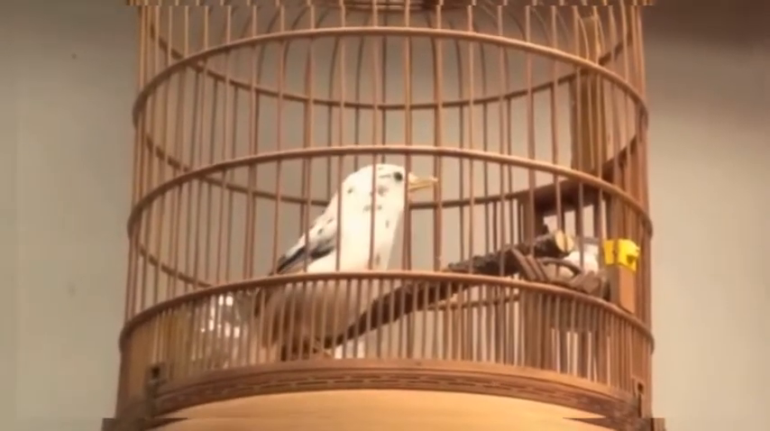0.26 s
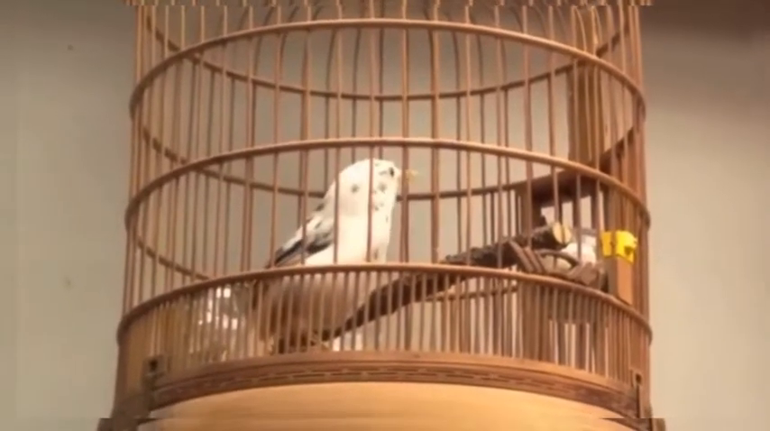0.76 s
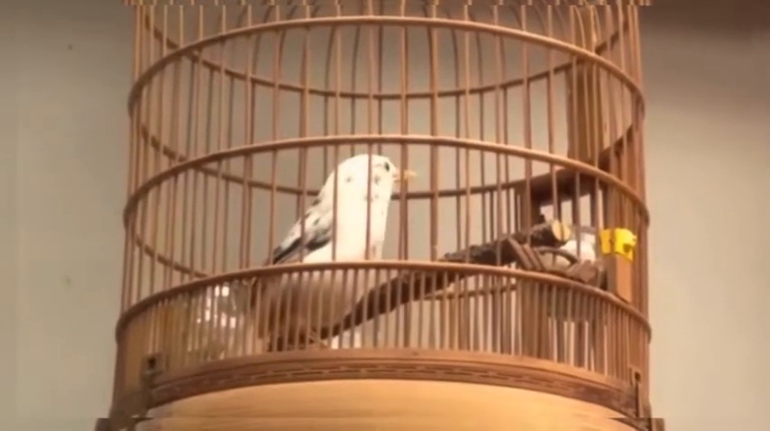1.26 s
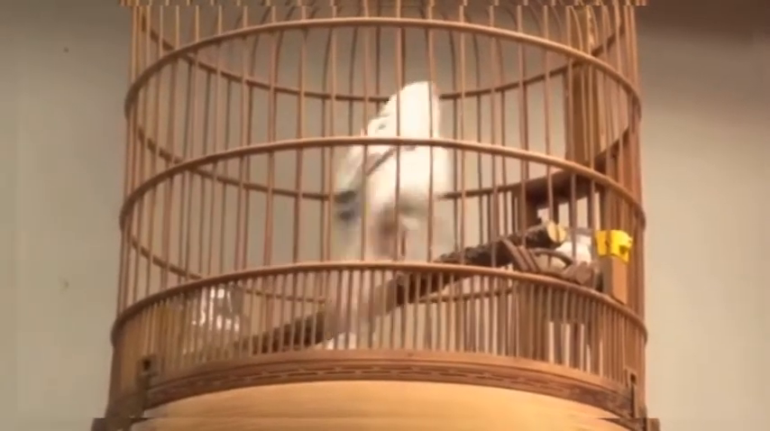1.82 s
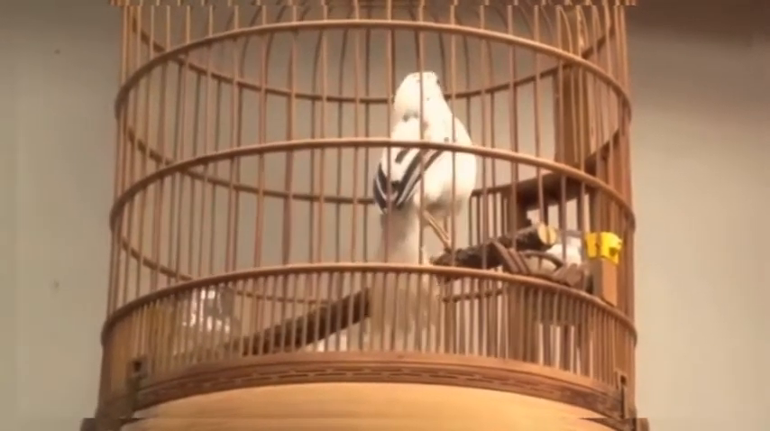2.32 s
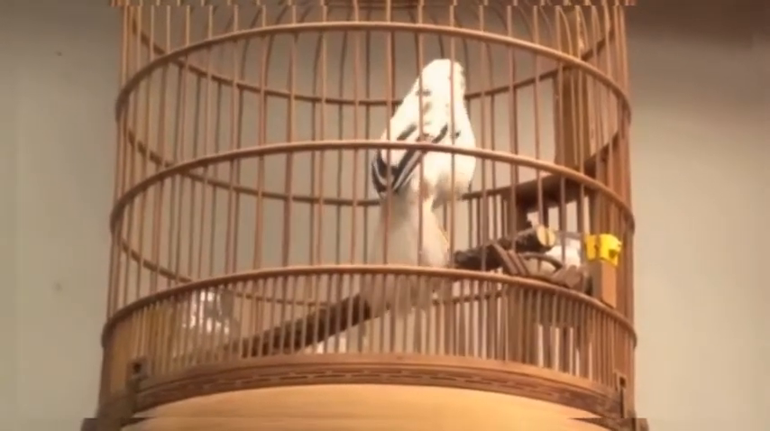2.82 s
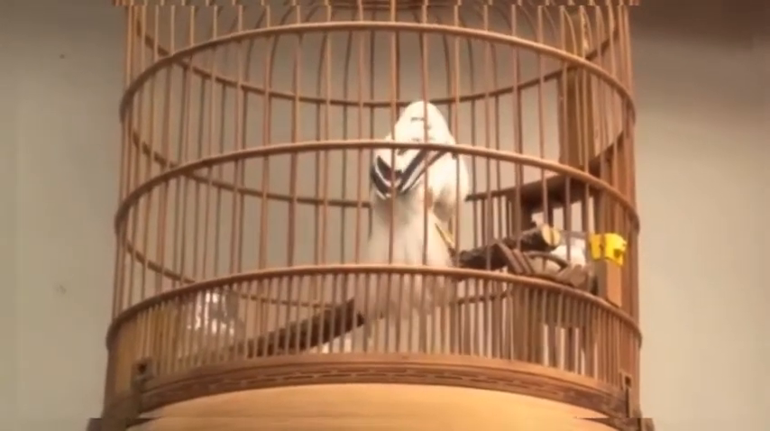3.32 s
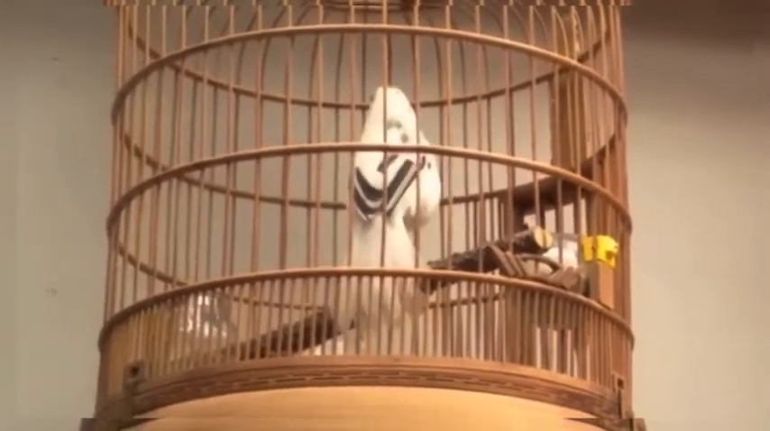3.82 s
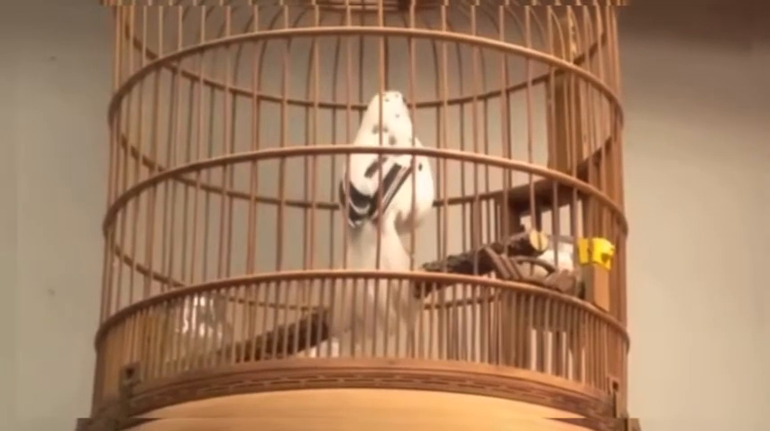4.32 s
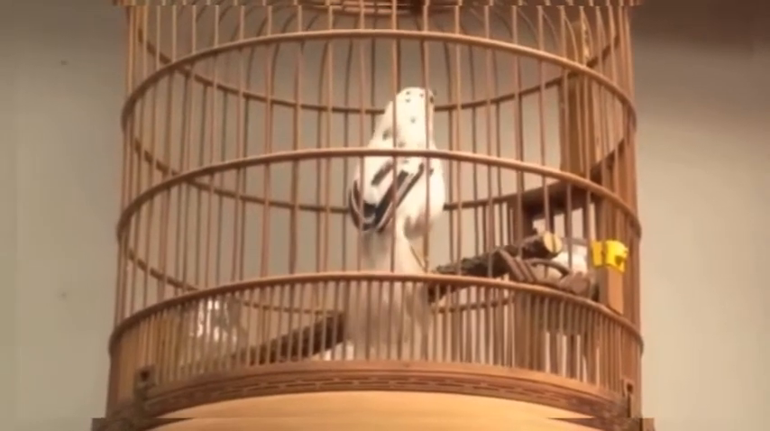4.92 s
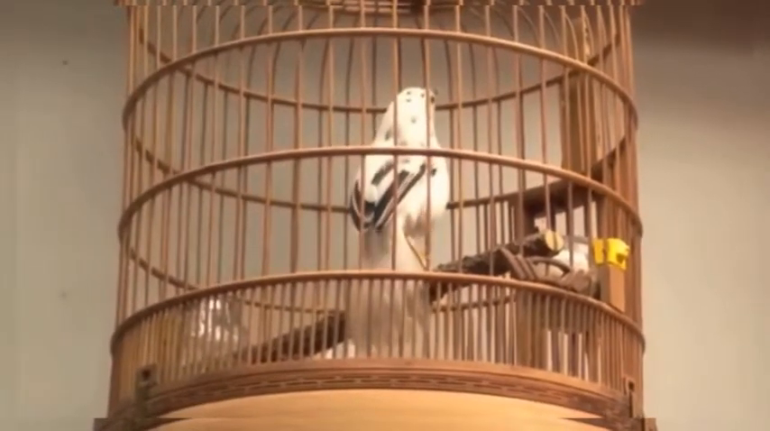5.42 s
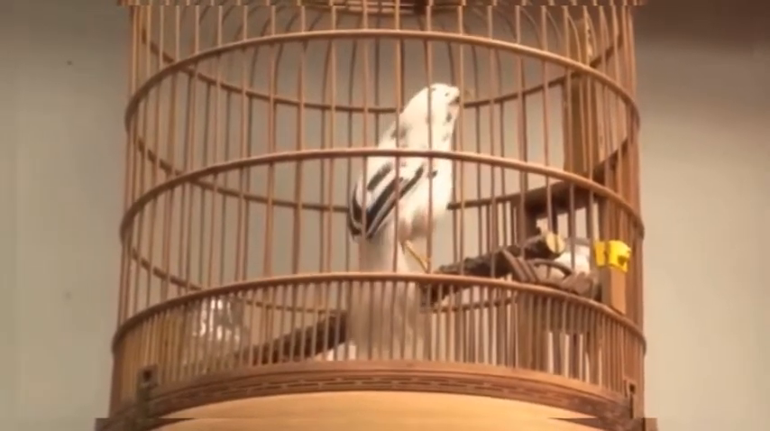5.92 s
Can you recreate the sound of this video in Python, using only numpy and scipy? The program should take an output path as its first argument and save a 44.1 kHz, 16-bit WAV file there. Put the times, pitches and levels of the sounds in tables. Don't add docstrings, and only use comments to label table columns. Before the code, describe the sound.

In a bare, echoing room, two birds overlap at first, the nearer one so loud it distorts. Then the caged bird sings alone at some distance: hoarse plunging chirps, soft falling calls, clear upward whistles, a rapid trill, a fast warble, two round whistles and a loud final note. Two dull knocks on the cage, the second harder, sit among the calls. Low rumble and airy hiss continue beneath, in stereo.

```python
import sys
import numpy as np
from scipy import signal
from scipy.io import wavfile
from scipy.ndimage import uniform_filter1d

SR = 44100
rng = np.random.default_rng(int(sys.argv[2]) if len(sys.argv) > 2 else 0)


def boost_factor(decibels):
    exponent = np.asarray(decibels, float) / 20
    return 10 ** exponent


def log_audio(samples):
    frames = np.atleast_2d(samples).T
    limited = np.clip(frames, -1, 1)
    pcm = np.round(limited * 32767).astype(np.int16)
    wavfile.write(sys.argv[1], SR, pcm)


N = 271656
LEAD = 6000

# (frequency [Hz], correlation [-1 to 1])
LIKENESS = [(25, .6), (70, .8), (150, .7), (300, .6), (600, .4), (1400, .1), (3000, .05), (15000, 0)]


def rms_one(x):
    return x / np.sqrt(np.mean(x ** 2) + 1e-20)


def at_hz(points, hz):
    points_hz, values = np.transpose(points)
    return np.interp(np.log(hz), np.log(points_hz), values)


def drift(rate_hz):
    r = np.exp(-80 * np.pi * rate_hz / SR)
    slow = signal.lfilter([1], [1, -2 * r, r * r], rng.standard_normal(N // 40 + 2002))[2000:]
    return np.interp(np.arange(N) / 40, np.arange(len(slow)), rms_one(slow))


def bandpass(low_hz, high_hz):
    return signal.butter(2, [low_hz, high_hz], "band", fs=SR, output="sos")


def bands(low_hz, high_hz):
    edges = low_hz * 2 ** np.arange(0, np.log2(high_hz / low_hz), .5)
    return [(np.sqrt(a * b), bandpass(a, b)) for a, b in zip(edges, edges[1:])]


def stereo_pair(mid, side, hz):
    alike = np.clip(at_hz(LIKENESS, hz), -1, 1)
    return np.sqrt(1 + alike) * mid + np.sqrt(1 - alike) * side * [[1], [-1]]


def banded_noise(spectrum, low_hz, high_hz, patchy_db):
    out = 0
    white = rng.standard_normal((2, 2, N))
    for k, (hz, sos) in enumerate(bands(low_hz, high_hz)):
        mid, side = signal.sosfilt(sos, white[k % 2])
        gain = boost_factor(at_hz(spectrum, hz) + patchy_db * drift(3.8))
        out = out + gain * stereo_pair(mid, side, hz)
    return rms_one(out)


def resonant_noise(modes):
    out = 0
    for hz, width_hz, db in modes:
        r = np.exp(-np.pi * width_hz / SR)
        ringing = [1, -2 * r * np.cos(2 * np.pi * hz / SR), r * r]
        mid, side = signal.lfilter([1, 0, -1], ringing, rng.standard_normal((2, N)))
        out = out + boost_factor(db + 1.2 * drift(5.8)) * rms_one(stereo_pair(mid, side, hz))
    return out


def humps(rows):
    t = np.arange(N) / SR
    return sum(db * np.exp(-((t - s) / half) ** 2) for s, half, db in rows)


def background_level():
    # (time [s], level [dB])
    level = [(0.0, -44), (0.88, -47), (0.95, -50.5), (1.1, -53), (1.75, -51.5), (1.92, -47.5), (2.08, -53),
             (3.14, -53.5), (3.5, -50), (4.459, -53), (4.65, -64), (4.781, -53.5), (5.2, -60), (5.42, -63),
             (5.6, -55.5), (5.92, -54), (6.0, -47), (6.16, -43.5)]
    return np.interp(np.arange(N) / SR, *np.transpose(level))


def rumble(swing_db):
    # (frequency [Hz], density [dB per Hz])
    spectrum = [(20, -13), (45, -20), (70, 5), (150, -37), (300, 0.5), (500, 2.5), (800, -1.5),
                (1200, -0.5), (1600, -5)]
    # (middle [s], half width [s], change [dB])
    lulls = [(1.9, 0.29, -5.5), (3.14, 0.36, -7), (3.6, 0.16, -7), (4.03, 0.16, -21), (4.8, 0.078, -7)]
    level_db = -51 + 3 + 0.49 * swing_db + humps(lulls)
    return boost_factor(level_db) * banded_noise(spectrum, 21.85, 1700, patchy_db=3.1)


def boom(swing_db):
    # (frequency [Hz], width [Hz], level [dB])
    modes = [(82.7, 6.8, -14), (109, 31, -0.5), (132.8, 2.4, -4.5), (230.5, 37, -4.5), (317.6, 24, -3.5),
             (340, 13, -26)]
    # (middle [s], half width [s], change [dB])
    swells = [(.07, 0.13, 2), (.87, 0.034, 10.5), (2.12, 0.053, 5), (2.75, .04, 11), (3.55, 0.32, 9),
              (4.5, 0.23, 7)]
    level_db = -49.5 - 3.5 + 0.38 * swing_db + humps(swells)
    return boost_factor(level_db) * resonant_noise(modes)


def hiss(level_db):
    # (frequency [Hz], density [dB per Hz])
    spectrum = [(700, -8), (1300, -15), (2200, 10.5), (3700, -1.5), (5200, 5.5), (6800, -16), (9500, -4.5),
                (11000, -15), (13000, -17), (15000, -11)]
    # (frequency [Hz], width [Hz], level [dB])
    whine = [(3920, 6, -5), (3750, 16.5, 4), (4650, 25, -5)]
    rush = boost_factor(14.5) * banded_noise(spectrum, 684, 17000, patchy_db=1.5)
    return boost_factor(level_db) * (rush + resonant_noise(whine))


def taps():
    # (time [s], peak level [dB])
    knocks = [
        (2.751, -39),
        (4.379, -21.5),
    ]
    clicks = np.zeros(N) + 1e-18
    for s, db in knocks:
        clicks[round(s * SR)] = boost_factor(db) * 12
    return signal.sosfilt(bandpass(150, 900), clicks)


def room(x, direct_db):
    # (frequency [Hz], time to fall 60 dB [s])
    t60 = [(500, 0.64), (1500, 0.42), (2500, 0.48), (3500, .48), (5000, 0.5), (12000, 0.3)]
    build_s, early_db, early_t60_s = 0.0041, -14, 0.1
    t = np.arange(SR) / SR
    white = rng.standard_normal((2, SR))
    early = boost_factor(early_db - 60 * t / early_t60_s)
    tail = 0
    for hz, sos in bands(349.0, 21000):
        tail = tail + signal.sosfilt(sos, white) * (boost_factor(-60 * t / at_hz(t60, hz)) + early)
    tail = tail * (1 - np.exp(-t / build_s))
    tail = tail / np.sqrt(np.sum(tail ** 2, axis=1, keepdims=True))
    echo = signal.fftconvolve(x[None], tail, axes=1)[:, LEAD:LEAD + N]
    return echo + boost_factor(direct_db) * x[LEAD:]


def add(out, t, hz, db, wobble, air, beak_db=0):
    overtones = [-28.5, -37, -40, -43.5]
    breath_db, beak_db_per_octave = -32, 16
    i = (t * SR).round().astype(int)
    phase = 2 * np.pi * np.cumsum(hz + wobble[np.clip(i, 0, N - 1)]) / SR
    upper = boost_factor(breath_db) * air[i % N]
    for multiple, over_db in enumerate(overtones, start=2):
        upper += boost_factor(over_db) * np.sin(multiple * phase) * (multiple * hz < .45 * SR)
    wave = np.sin(phase) + upper * boost_factor(beak_db + beak_db_per_octave * np.log2(hz / 3000))
    edge = np.clip(np.minimum(t - t[0], t[-1] - t) / 0.00097, 0, 1)
    out[i + LEAD] += np.sqrt(2) * boost_factor(db) * wave * edge


def notes(tables, flutter, air, beak_db=0):
    out = np.zeros(LEAD + N)
    for depth_hz, rows in tables:
        s, hz, db = np.transpose(rows)
        t = np.arange(round(s[0] * SR), min(round(s[-1] * SR), N)) / SR
        glide = uniform_filter1d(np.interp(t, s, hz), size=220, mode="nearest")
        add(out, t, glide, np.interp(t, s, db), depth_hz * flutter, air, beak_db)
    return out


def near_bird(air):
    # (time [s], pitch [Hz], level [dB])
    calls = [
        [(-0.08, 1878, -19), (-0.05, 2500, -14), (-0.025, 3077, -14), (-0.005, 3650, -14.5),
         (0.012, 3368, -14.5), (0.03, 3230, -25)],
        [(0.10, 3440, -16), (0.13, 3205, -15), (0.18, 3120, -4.5), (0.205, 2658, -7), (0.222, 1965, -27)],
        [(0.23, 2050, -14), (0.29, 2260, -10), (0.345, 2403, -5.5), (0.40, 2400, -12), (0.43, 2346, -14.5),
         (0.445, 2074, -5), (0.46, 1896, -15.5), (0.48, 2277, -12), (0.53, 2426, -19)],
    ]
    dry_calls = notes([(8, rows) for rows in calls], drift(70), air, beak_db=-9)
    return boost_factor(-1) * room(dry_calls, direct_db=-6)


def hoarseness(flutter_hz):
    return np.sin(2 * np.pi * np.cumsum(flutter_hz * boost_factor(3 * drift(39.9))) / SR)


def trill(out, flutter, air):
    # (start [s], bottom pitch [Hz], top pitch [Hz], level [dB])
    flicks = [(4.657, 1494, 3200, -21), (4.713, 1526, 3603, -21), (4.773, 1586, 3880, -19),
              (4.829, 1586, 3900, -21.5), (4.892, 1597, 3800, -17.5), (4.952, 1642, 3097, -15),
              (5.011, 1502, 2900, -15)]
    flick_s, depth_hz = .025, 274
    for s, bottom_hz, top_hz, db in flicks:
        t = np.arange(round(s * SR), round((s + flick_s) * SR)) / SR
        share = np.linspace(0, 1, len(t))
        fall = top_hz + (bottom_hz - top_hz) * share
        swell_db = db - 18 * (1.63 * share - .9) ** 2
        add(out, t, fall, swell_db, depth_hz * flutter, air, beak_db=3)


def warble(out, flutter, air):
    # (time [s], centre pitch [Hz], swing [Hz], level [dB])
    course = [(5.045, 2010, 288, -30), (5.07, 1807, 275, -15), (5.13, 1896, 273, -20),
              (5.189, 1964, 200, -15.5), (5.238, 2010, 106.5, -13), (5.329, 1886, 298, -28)]
    warble_hz, depth_hz = 39.1, 101
    s, hz, swing_hz, db = np.transpose(course)
    t = np.arange(round(s[0] * SR), round(s[-1] * SR)) / SR
    swing = np.interp(t, s, swing_hz) * np.sin(2 * np.pi * warble_hz * (t - s[0]))
    add(out, t, np.interp(t, s, hz) + swing, np.interp(t, s, db), depth_hz * flutter, air)


def score():
    # (start [s], length [s], shift [semitones], level [dB], flutter depth [Hz])
    drop_shape = [(0, 4650, -13), (.12, 3491, -6.5), (.4, 2448, 3), (.68, 1535, -9), (1, 1060, -18)]
    drops = [(.319, .056, 0.064, -10, 238), (1.207, .056, -0.307, -13.5, 130)]
    churr_shape = [(0, 1530, -3.5), (.2, 2050, -7), (.45, 1746, -9.5), (.6, 1616, -5), (.8, 1780, -7.5),
                   (1, 1620, -19)]
    churrs = [(.45, .13, -2, -18.5, 235), (1.29, .22, 0.47, -18, 333)]
    step_shape = [(0, 847, -24.5), (.3, 1148, -15.5), (.53, 1992, -0.2), (.8, 2024, -4.5), (1, 2880, -10)]
    steps = [(.062, 0.054, 0.21, -8.5, 45), (.929, 0.059, -0.17, -15, 35.5)]
    fall_shape = [(0, 2510, -8), (.12, 1735, -3), (.3, 1500, -10.5), (1, 1234, -17)]
    falls = [(2.294, .07, -0.5, -24, 293), (2.517, 0.063, 1.65, -17, 305), (2.694, .05, -1.5, -22, 297),
             (3.005, 0.045, 0.8, -20.5, 340), (3.239, 0.051, 2.1, -14, 290), (4.616, 0.033, 0, -26, 238)]
    chip_shape = [(0, 4682, -9.5), (.38, 4900, -6.1), (.58, 3573, 1.5), (.75, 2700, -8), (1, 1699, -10.5)]
    chips = [(3.139, 0.052, .1, -14.5, 140), (3.625, 0.023, -0.14, -16, 170),
             (4.097, .031, 0.064, -16.5, 170)]
    rise_shape = [(0, 1700, -17), (.2, 1960, -4), (.4, 2172, -7), (.58, 2560, -4.5), (.74, 3080, -1.6),
                  (1, 3148, -22.5)]
    rises = [(3.337, 0.11, 0.17, -10.5, 11), (3.77, 0.15, 0.09, -12, 24), (4.251, .135, -0.093, -11, 27)]
    arch_shape = [(0, 2250, -6), (.14, 2641, -0.3), (.46, 2779, 0.5), (.77, 2600, -1), (1, 2490, -9)]
    arches = [(5.462, .098, -.3, -16.5, 30), (5.617, .083, 0.73, -14, 30)]
    # (flutter depth [Hz], points (time [s], pitch [Hz], level [dB]))
    singles = [
        (360, [(1.767, 2310, -20), (1.773, 3100, -19), (1.803, 3787, -21), (1.82, 3230, -13.5), (1.835, 2132, -18.5), (1.855, 1657, -34)]),
        (200, [(1.90, 2466, -27), (1.915, 3116, -12), (1.935, 3815, -22), (1.953, 3310, -22)]),
        (30, [(1.95, 3294, -17.5), (1.99, 2930, -14.5), (2.02, 2702, -14.5), (2.08, 2830, -29)]),
        (70, [(2.688, 1963, -22), (2.703, 1984, -21), (2.715, 2070, -27), (2.73, 2290, -31.5), (2.75, 2840, -29)]),
        (60.4, [(2.786, 3460, -24), (2.791, 4250, -22.5), (2.798, 5120, -30), (2.81, 5620, -31), (2.83, 5670, -35)]),
        (51, [(2.805, 2630, -16.5), (2.83, 2865, -16.5), (2.85, 2390, -14.5), (2.87, 2000, -13), (2.91, 1366, -36.5)]),
        (45, [(5.98, 1655, -22), (5.992, 1701, -11), (6.04, 1714, -18.5), (6.07, 1535, -10), (6.11, 1622, -23), (6.16, 1496, -5)]),
    ]
    # (start [s], length [s], from pitch [Hz], to pitch [Hz], level [dB])
    murmurs = [(2.24, 0.48, 3798, 3825, -46), (3.045, 0.021, 1183, 2310, -30),
               (4.318, 0.014, 1140, 1080, -35.5), (4.357, 0.034, 1595, 1410, -31.5),
               (5.04, 0.12, 540, 501, -49.5), (5.411, 0.026, 690, 715, -39.5),
               (5.393, 0.04, 1418, 1223, -39.5), (6.075, 0.041, 1097, 628, -34.5)]
    repeated = [(drop_shape, drops), (churr_shape, churrs), (step_shape, steps), (fall_shape, falls),
                (chip_shape, chips), (rise_shape, rises), (arch_shape, arches)]
    out = list(singles)
    for shape, sung in repeated:
        for s, length, shift, db, depth_hz in sung:
            ratio = 2 ** (shift / 12)
            out.append((depth_hz, [(s + share * length, hz * ratio, db + under) for share, hz, under in shape]))
    for s, length, from_hz, to_hz, db in murmurs:
        out.append((8.7, [(s, from_hz, db), (s + length, to_hz, db - 3)]))
    return out


def caged_bird(air):
    flutter = hoarseness(flutter_hz=108.97)
    song = notes(score(), flutter, air)
    trill(song, flutter, air)
    warble(song, flutter, air)
    return room(song, direct_db=-9.5) * boost_factor([[-.3], [.3]])


def scene():
    hiss_db = background_level()
    swing_db = hiss_db + 53
    building = rumble(swing_db) + boom(swing_db) + hiss(hiss_db)
    air = rng.standard_normal(N)
    birds = near_bird(air) + caged_bird(air)
    return building + taps() + boost_factor(2.0) * birds


def band_limit(x):
    return signal.sosfilt(signal.butter(12, 15670, fs=SR, output="sos"), x)


def record(dry):
    clipped = np.clip(dry, -.99, .99)
    mic_top = signal.butter(4, 15200, fs=SR, output="sos")
    mix = signal.sosfilt(mic_top, clipped)
    return band_limit(mix)


dry = scene()
out = record(dry)
log_audio(out)
```